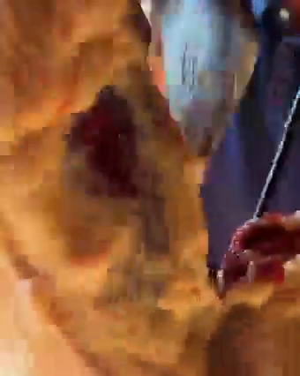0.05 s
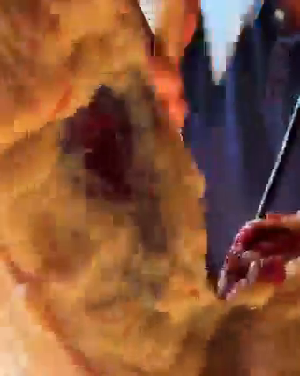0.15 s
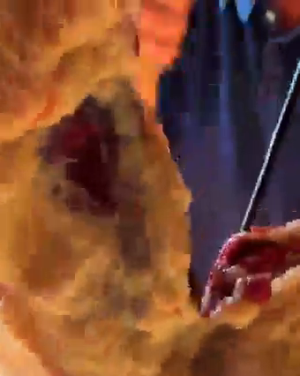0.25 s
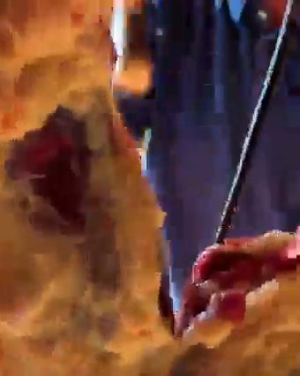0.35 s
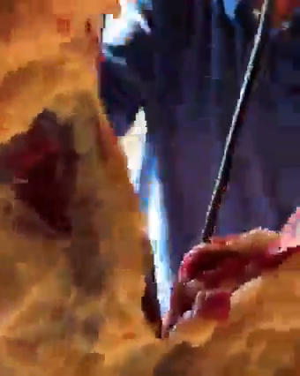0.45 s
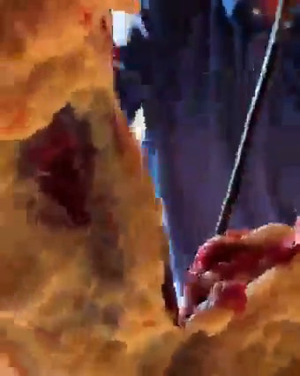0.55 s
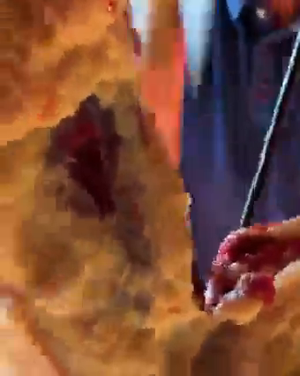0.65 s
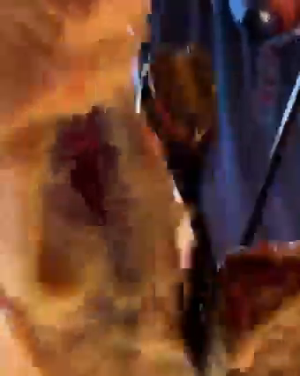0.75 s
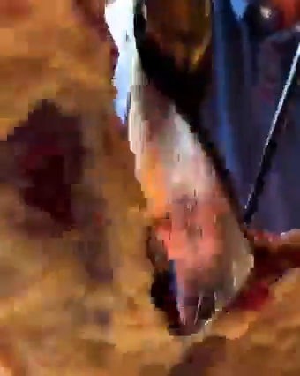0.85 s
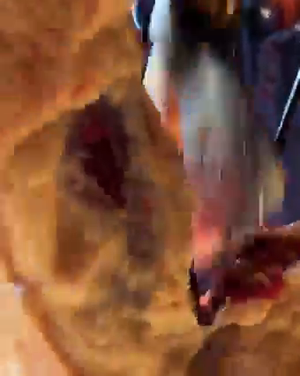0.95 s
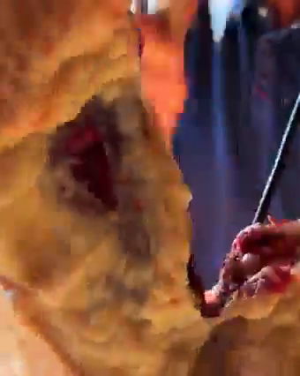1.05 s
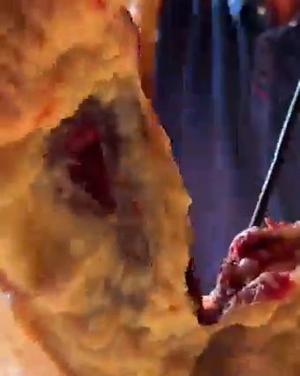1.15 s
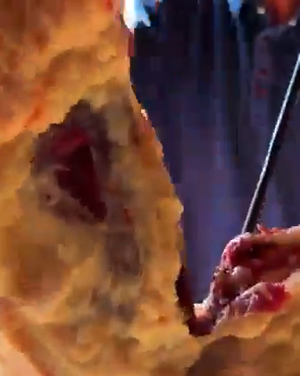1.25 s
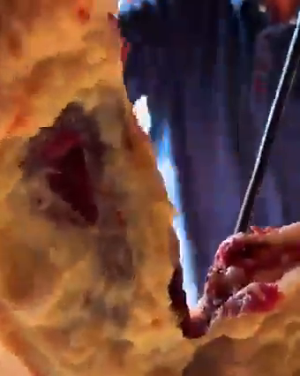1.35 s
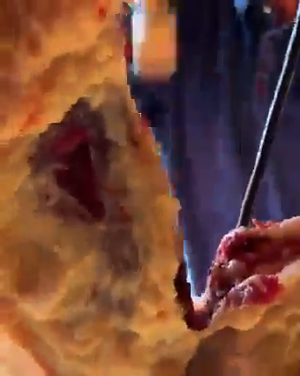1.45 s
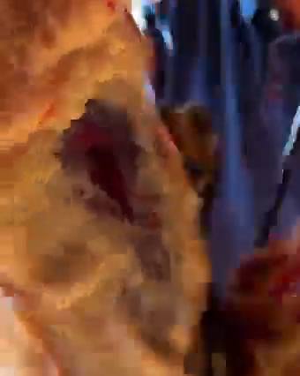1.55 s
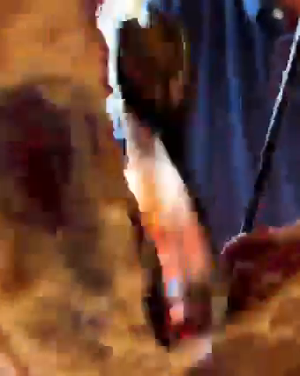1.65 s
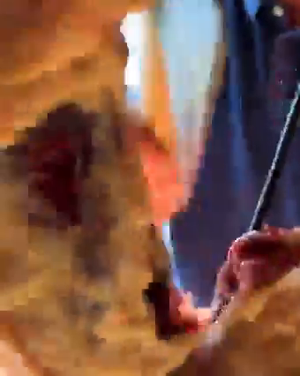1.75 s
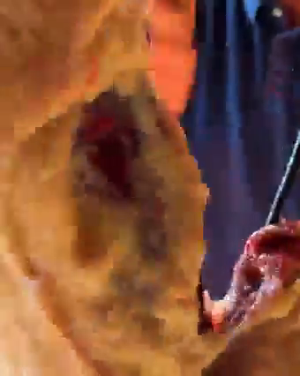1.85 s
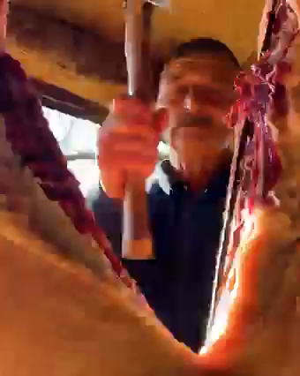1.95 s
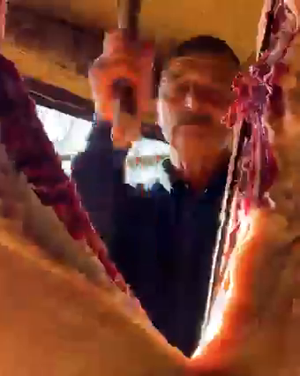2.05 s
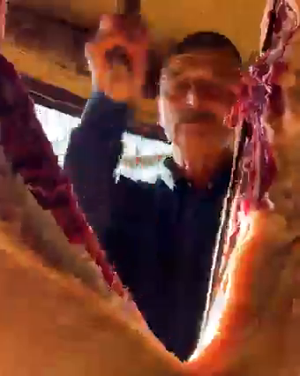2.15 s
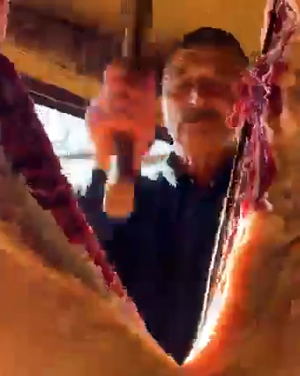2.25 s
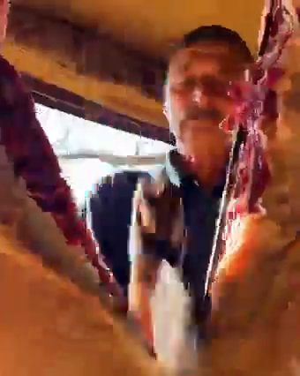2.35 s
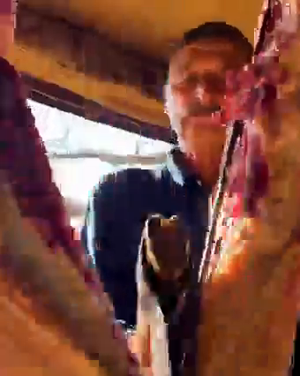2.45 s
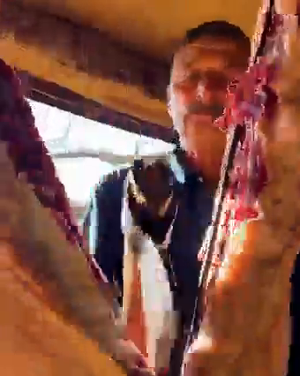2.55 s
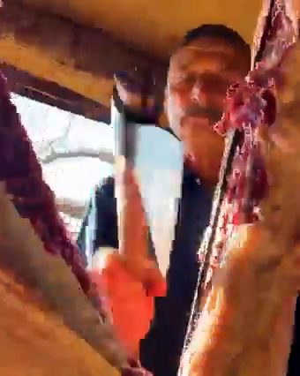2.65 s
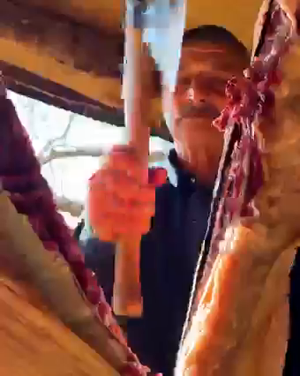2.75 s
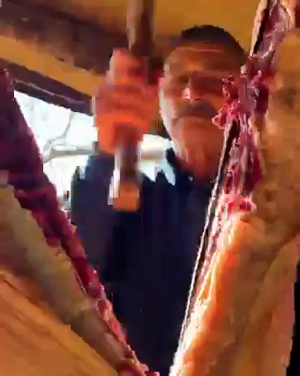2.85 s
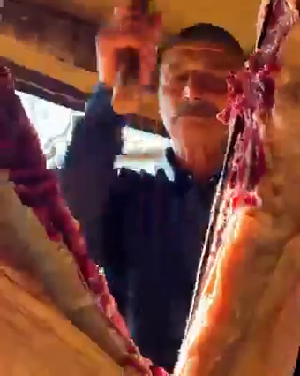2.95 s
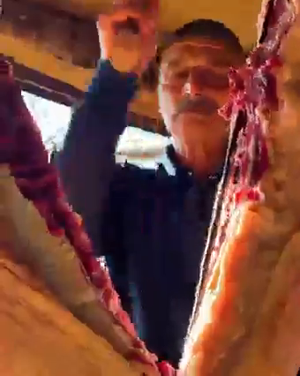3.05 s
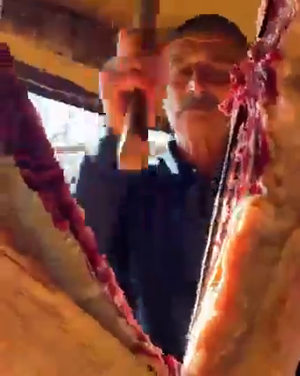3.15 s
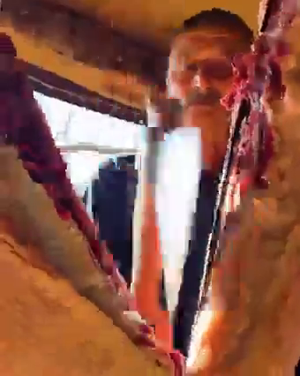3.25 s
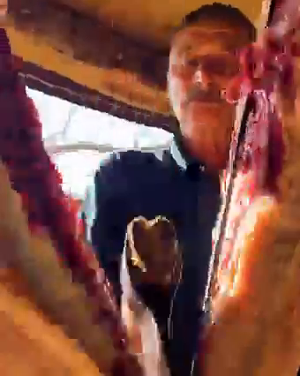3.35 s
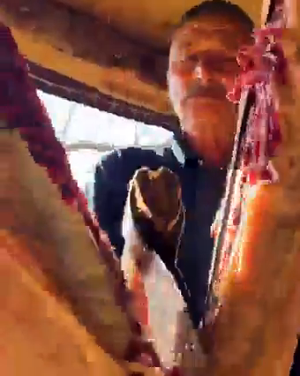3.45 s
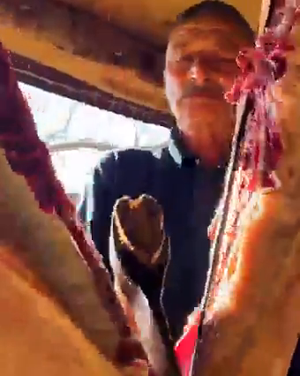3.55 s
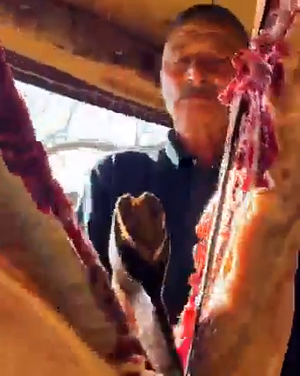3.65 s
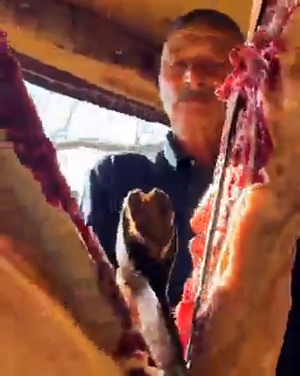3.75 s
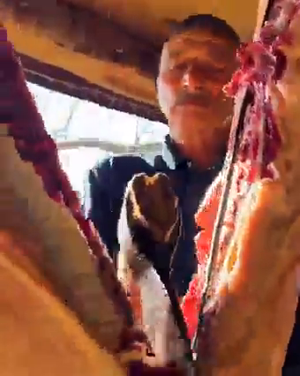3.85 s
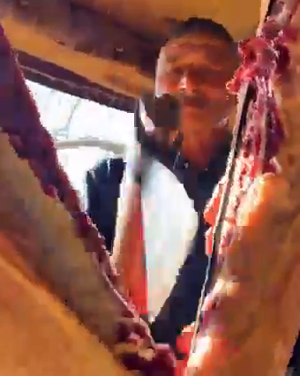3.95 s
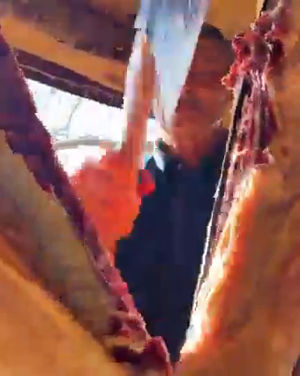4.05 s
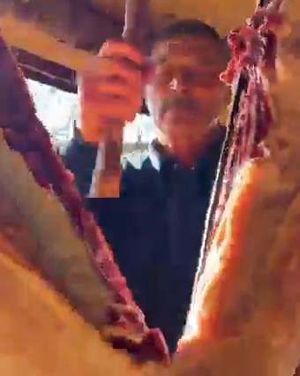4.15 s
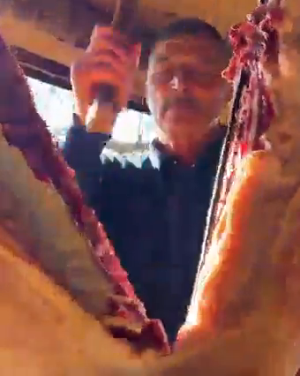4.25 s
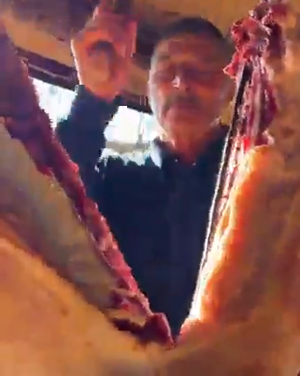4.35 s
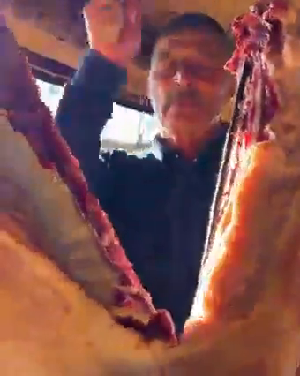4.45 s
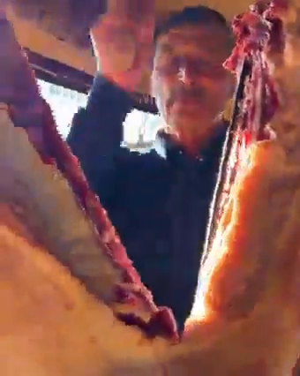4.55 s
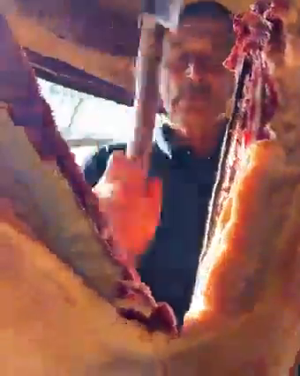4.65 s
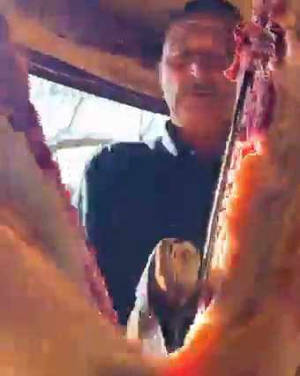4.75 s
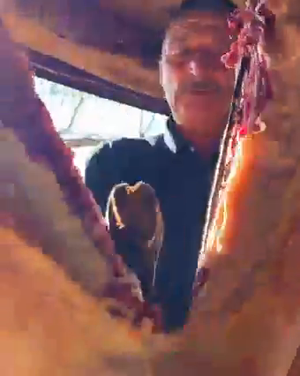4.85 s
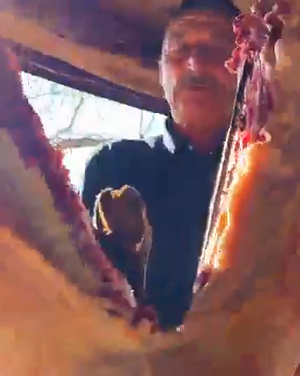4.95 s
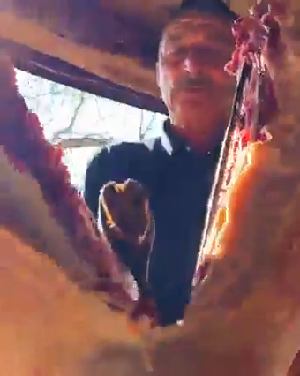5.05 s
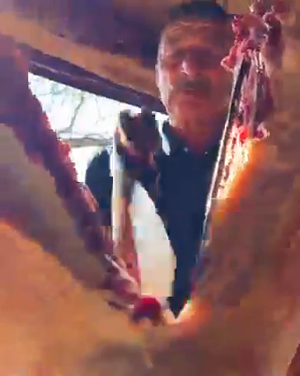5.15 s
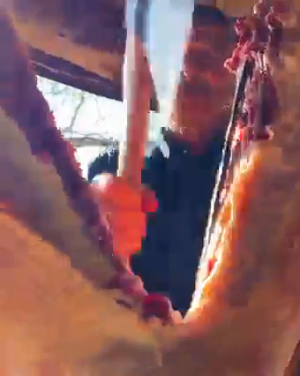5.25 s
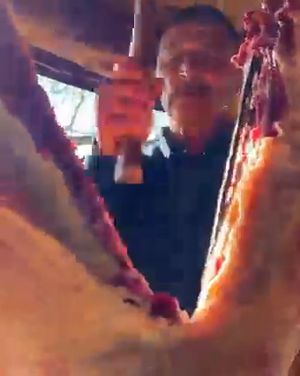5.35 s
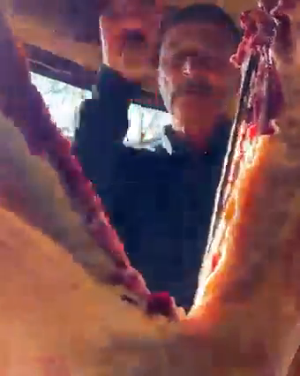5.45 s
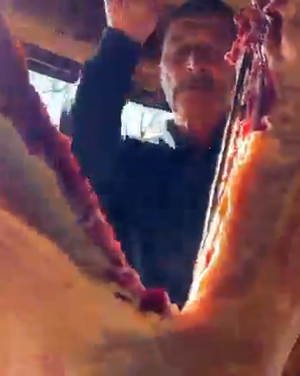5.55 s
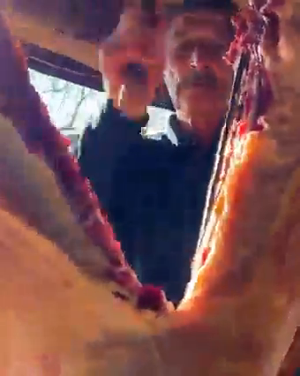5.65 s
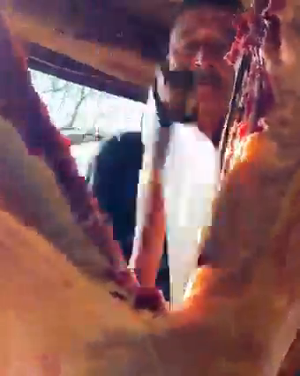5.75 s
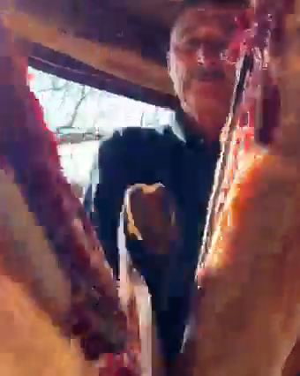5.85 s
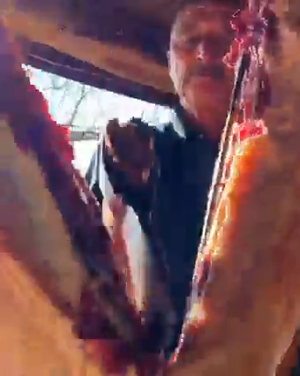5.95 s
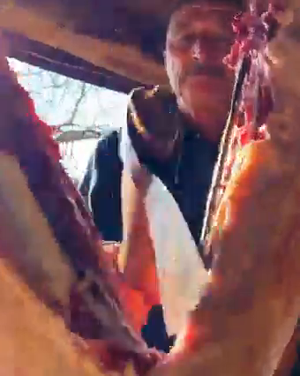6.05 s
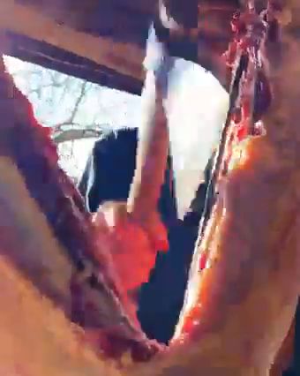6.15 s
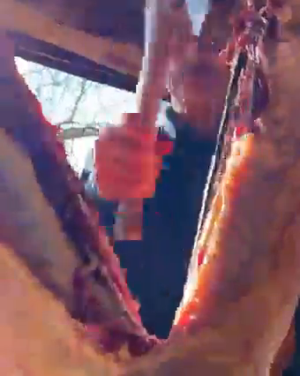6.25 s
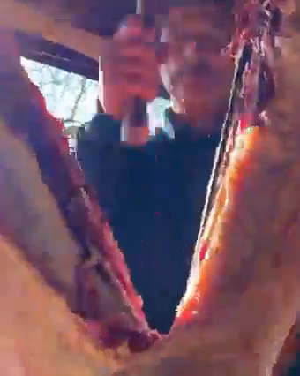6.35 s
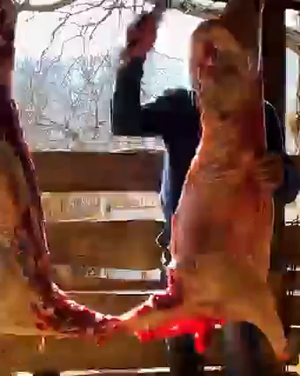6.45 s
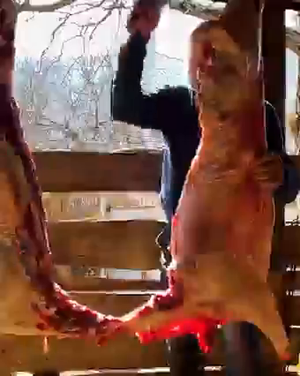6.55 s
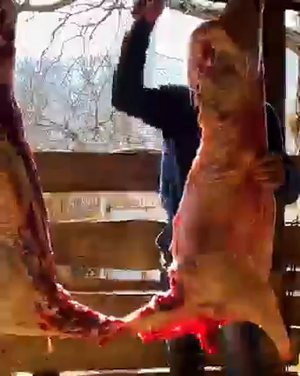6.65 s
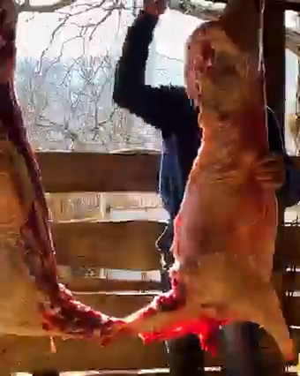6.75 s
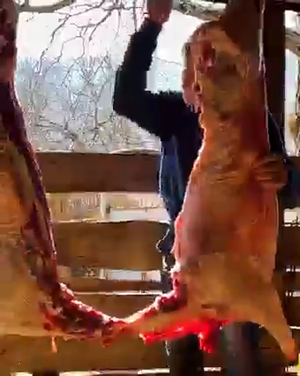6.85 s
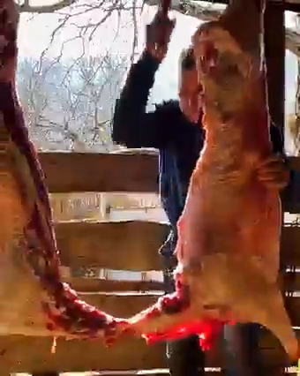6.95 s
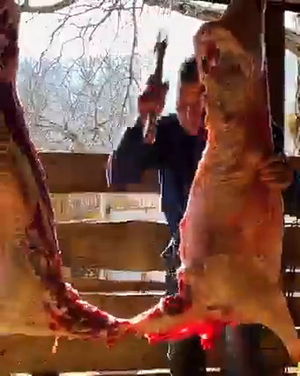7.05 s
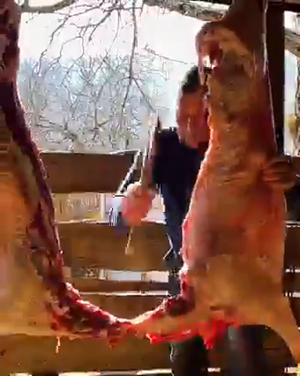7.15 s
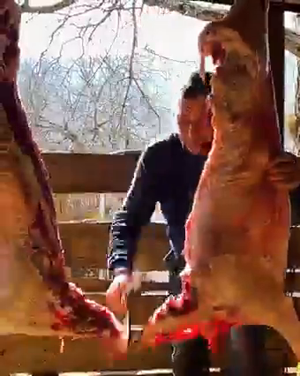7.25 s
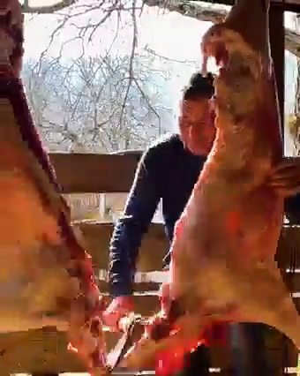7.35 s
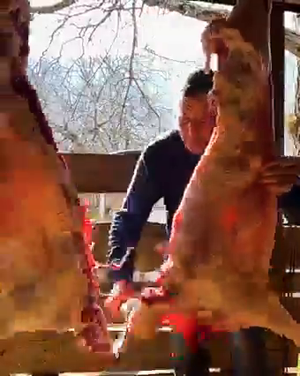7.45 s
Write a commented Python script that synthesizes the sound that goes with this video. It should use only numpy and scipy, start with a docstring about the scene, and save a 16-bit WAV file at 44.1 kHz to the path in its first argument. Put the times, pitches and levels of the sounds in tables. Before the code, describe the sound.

Small birds twitter lively outside an open wooden shed for the first second and a half, over low outdoor rumble and faint hiss. A soft bump comes at 0.3 s. A cleaver hits a hanging carcass at 0.7 s: a sharp crack of bone, dull fleshy thud, short steel ring and tight echo from boards and roof. The next blow at 1.55 s is harder and knockier, with a rough squeak. The air drops quieter near 2 s. Blows at 2.4 and 3.3 s sound more hollow and drumlike; after a gap, longer splintering crunches come at 4.7 and 5.8 s. Faint wet clicks and bumps fill the gaps, with occasional hoarse falling bird calls. At 7.25 to 7.3 s the last chop goes through with snapping bone and ripping sinew, then rustling and dull bumps as the halves part by 7.5 s. Close microphone, little reverberation.

```python
"""Small birds twitter outside an open wooden shed, over low rumble and far hiss of the open country.
Inside, a butcher splits a hanging carcass: each cleaver blow slices fat, bites and crunches through bone.
Shaped noise drives filters and damped modes for backbone, ribs, flesh and steel; wet clicks fill the gaps.
The last blow goes right through: the halves tear in jerks of grainy noise and rustle apart."""
import sys
import numpy as np
from scipy import signal
from scipy.fft import rfft, irfft, next_fast_len
from scipy.io import wavfile

SR = 44100
rng = np.random.default_rng(int(sys.argv[2]) if len(sys.argv) > 2 else 0)


def int16_out(signal):
    """Quantize to a 16-bit WAV file."""
    q = np.round(np.clip(np.atleast_2d(signal).T, -1, 1) * 32767)
    wavfile.write(sys.argv[1], SR, q.astype(np.int16))


N = 331163
SPAN = 22050  # samples given to one event
AGE = np.arange(SPAN) / SR
TIME = np.arange(N) / SR


def from_db(db):
    """Decibels to gain."""
    return 10 ** (np.asarray(db) / 20)


def rms_one(x):
    """Scale to rms 1."""
    return x / np.sqrt(np.mean(x ** 2) + 1e-20)


def burst_one(x):
    """Scale a burst to the energy of a tenth of a second at rms 1."""
    return rms_one(x) * np.sqrt(SR / 10 / x.shape[-1])


def at_hz(points, hz):
    """Read a table on a log-frequency axis."""
    f, value = np.transpose(points)
    return np.interp(np.log(np.maximum(hz, 1)), np.log(f), value)


def gains_in_time(rows):
    """Each dB column of a curve as a gain per sample."""
    s, *columns = np.transpose(rows)
    return [from_db(np.interp(TIME, s, c)) for c in columns]


def pan(db):
    """Left and right gains for a level difference, left over right."""
    return rms_one(from_db(np.array([[db], [-db]]) / 2))


def add(out, s, x):
    """Mix x in at time s."""
    i = int(round(s * SR))
    out[:, i:i + x.shape[-1]] += x[..., :N - i]


def drift(rate, size):
    """Random wander: straight lines between normally distributed knots, rate of them per second."""
    knots = np.arange(size) * rate / SR
    return np.interp(knots, np.arange(4096), rng.standard_normal(4096))


def colour(x, spectrum):
    """Causal (minimum-phase) filter with the given spectrum; it falls off further beyond both ends."""
    size = next_fast_len(x.shape[-1] // 2 + SPAN // 2) * 2
    hz = np.maximum(np.fft.rfftfreq(size, 1 / SR), 1)
    octaves_out = np.abs(np.log2(hz / np.clip(hz, spectrum[0][0], spectrum[-1][0])))
    db = np.maximum(at_hz(spectrum, hz) - 15 * octaves_out, -90)
    # folding the cepstrum onto positive time gives the minimum phase
    cepstrum = irfft(np.log(from_db(db)))
    response = np.exp(rfft(2 * cepstrum[:size // 2], size) - cepstrum[0])
    return irfft(rfft(x, size) * response)[..., :x.shape[-1]]


def ring(x, hz, t60):
    """One damped mode, a two-pole resonator that loses 60 dB in t60 seconds."""
    r, w = from_db(-60 / (t60 * SR)), 2 * np.pi * hz / SR
    return signal.lfilter([np.sin(w), 0, -np.sin(w)], [1, -2 * r * np.cos(w), r * r], x + 1e-18)


# likeness of left and right at the microphone: (frequency [Hz], correlation [-1 to 1])
LIKENESS = [(150, .96), (350, .9), (520, .65), (700, .05), (1600, .35), (3200, -.25), (5500, .2),
            (12000, 0)]


def stereo_noise(size, grain_db=0):
    """Noise most alike on both sides in the bass; grain_db roughens it into separate clicks."""
    grains = from_db(grain_db * np.minimum(rng.exponential(1, size), 5))
    mid, side = rfft(rng.standard_normal((2, size)) * grains)
    alike = np.clip(at_hz(LIKENESS, np.fft.rfftfreq(size, 1 / SR)), -.98, .98)
    both = np.sqrt(1 + alike) * mid + np.sqrt(1 - alike) * side * [[1], [-1]]
    return rms_one(irfft(both, size))


# decay under the shed roof: (frequency [Hz], time to fall 60 dB [s])
SHED_T60 = [(60, 1), (150, 0.025), (350, 0.14), (900, .145), (2500, 0.14), (6000, 0.21), (12000, 0.3)]


def in_shed(force, hz, wet_db, grain_db):
    """Noise crackles with the force; dense reflections off boards and roof die away after it."""
    energy = force ** 2
    keep = from_db(-120 / (at_hz(SHED_T60, hz) * SR))  # energy kept per sample
    lingering = signal.lfilter([1 - keep], [1, -keep], energy)
    far = np.cumsum(energy) / SR * from_db(-26.0 - 64 * AGE)  # faint, longer answer of the yard
    direct = force * stereo_noise(SPAN, grain_db)
    return direct + from_db(wet_db) * np.sqrt(lingering + far) * stereo_noise(SPAN)


FIRST_ECHOES_S = .012  # near boards and posts give back the first echoes within this time


def first_echoes(x, echo_db, count=8):
    """A few distinct reflections, other ones for each side, comb the sound."""
    echoes = np.zeros_like(x)
    for side, lags in enumerate(rng.uniform(.001, FIRST_ECHOES_S, (2, count))):
        for lag, sign in zip(lags, rng.choice([-1, 1], count)):
            echoes[side] += sign * np.pad(x[side], (int(lag * SR), 0))[:SPAN]
    return x + from_db(echo_db) * echoes


ROOF_ECHO_S, ROOF_DB = .021, -13.5


def under_roof(x):
    """The roof throws back one clear echo, with left and right swapped."""
    delayed = np.pad(x[::-1], ((0, 0), (int(ROOF_ECHO_S * SR), 0)))[:, :SPAN]
    return x + from_db(ROOF_DB) * delayed


# outdoor air around the shed: (time [s], rumble level [dB], far hiss level [dB])
AIR = [(0.0, -52, -61.5), (1.86, -52.5, -66.5), (2.05, -61.5, -69), (6.17, -60, -67.5), (7.2, -72.5, -69)]
# colours of the low rumble and the far hiss: (frequency [Hz], gain [dB])
RUMBLE = [(15, -12.5), (55, 4.5), (90, 1.5), (145, -10), (220, -8), (400, -12), (480, -22), (800, -51.5)]
HISS = [(350, -16), (550, 0.5), (850, -0.5), (1500, 4), (3200, -1.5), (4500, -9), (6200, -16.5), (7200, -8),
        (8200, -18.5), (11000, -21), (16000, -23)]


def air():
    """Low rumble and far hiss of the open country: filtered noise whose levels waver."""
    rumble, hiss = gains_in_time(AIR)
    white = stereo_noise(next_fast_len(N))[:, :N]
    low = rumble * from_db(0.6 * drift(14.0, N)) * rms_one(colour(white, RUMBLE))
    high = hiss * from_db(0.2 * drift(40, N)) * rms_one(colour(white, HISS))
    return low + high


def chirp(length_s, pitches_hz, hoarse, db):
    """A whistle that arches through three pitches and rasps, smeared by the trees it comes through."""
    along = np.minimum(AGE / length_s, 1)
    arch_hz = np.polyval(np.polyfit([0, .5, 1], pitches_hz, 2), along)
    hz = arch_hz * (1 + hoarse * drift(1100, SPAN))
    note = np.sqrt(along) * (1 - along) * np.sin(2 * np.pi * np.cumsum(hz) / SR)
    trees = rng.standard_normal((2, SPAN)) * from_db(-260 * AGE)
    smeared = signal.fftconvolve(note[None], trees, axes=1)[:, :SPAN]
    heard = burst_one(note) + from_db(-2.5) * burst_one(smeared)
    return from_db(db) * burst_one(heard) * np.sqrt(length_s * 10)  # longer notes carry more energy


# short arcs of twitter:
# (time [s], start pitch [Hz], middle pitch [Hz], end pitch [Hz], level [dB])
TWITTERS = [(0.036, 4530, 5020, 4850, -63), (.085, 4100, 3560, 3600, -64.5), (.209, 3670, 4100, 3680, -61),
            (.484, 5200, 3920, 4670, -58.5), (.56, 4100, 3923, 3540, -64.5),
            (0.968, 4780, 4520, 3900, -61.5), (1.047, 3720, 4300, 4600, -61),
            (1.132, 4800, 4730, 4660, -62.5), (1.322, 5100, 3950, 4460, -59.5),
            (1.372, 3980, 4430, 3930, -61)]
# clear notes of another bird: (time [s], length [s], pitch [Hz], level [dB])
WHISTLES = [(.826, .14, 3040, -58), (1.908, .04, 3940, -50), (2.043, .035, 3900, -57)]
# one bird's hoarse falling call: (time [s], length [s], level [dB])
CALLS_OF_BIRD = [(2.209, 0.13, -66.5), (3.082, 0.16, -65.5), (3.886, 0.12, -65), (5.645, 0.15, -65.5),
                 (6.089, 0.12, -63.5), (6.754, 0.22, -70.5)]
# hoarseness and sag are shares of the pitch
TWITTER_NOTE_S, TWITTER_HOARSE = .04, .055
WHISTLE_SAG, WHISTLE_HOARSE = 0.011, 0.018
CALL_HZ, CALL_HOARSE = (4500, 3400, 2850), .145
# more birds far off: end [s], number of notes, pitch range [Hz], level [dB]
CHORUS_END_S, CHORUS_COUNT, CHORUS_HZ, CHORUS_DB = 1.42, 30, (3300, 5500), -72.5


def birds():
    """Runs of twitter, clear whistles and falling calls from the trees, each note a gliding sine."""
    out = np.zeros((2, N))
    for when, first, last in rng.random((CHORUS_COUNT, 3)):
        pitches_hz = np.interp([first, (first + last) / 2, last], [0, 1], CHORUS_HZ)
        note = chirp(TWITTER_NOTE_S, pitches_hz, TWITTER_HOARSE, CHORUS_DB)
        add(out, when * CHORUS_END_S, note)
    for s, *pitches_hz, db in TWITTERS:
        add(out, s, chirp(TWITTER_NOTE_S, pitches_hz, TWITTER_HOARSE, db))
    for s, length_s, hz, db in WHISTLES:
        add(out, s, chirp(length_s, [hz, hz, hz * (1 - WHISTLE_SAG)], WHISTLE_HOARSE, db))
    for s, length_s, db in CALLS_OF_BIRD:
        add(out, s, chirp(length_s, CALL_HZ, CALL_HOARSE, db))
    return out


# dull bumps as the carcass shifts and the blade comes free:
# (time [s], length [s], low level [dB], knock level [dB])
BUMPS = [(0.275, 0.069, -47.5, -62), (3.5, 0.0081, -45.5, -54.5), (5.054, 0.051, -49.5, -46),
         (6.122, 0.038, -51, -45.5), (6.39, 0.0094, -65, -69.5), (7.326, 0.021, -36.5, -35),
         (7.412, 0.051, -36.5, -50), (7.471, 0.036, -34, -34)]
# colours of flesh, rib cage and a soft shove against the carcass: (frequency [Hz], gain [dB])
THUD = [(20, -16), (40, 1.5), (62, 0), (110, -3), (160, -6), (260, -21)]
RIBS = [(110, -14.5), (160, -5), (205, 4.5), (420, 7), (490, -3), (600, -4), (700, -0.5), (850, -42)]
SHOVE = [(200, -18), (420, 11.5), (560, 1.5), (1000, -6.5), (1900, -16.5), (5000, -52)]


def bump(length_s, low_db, knock_db):
    """A soft shove, slow to rise, sounds mostly in the low resonances."""
    force = np.exp(-(AGE / length_s) ** 2) * (1 - np.exp(-AGE / (0.19 * length_s)))
    shove = in_shed(force, 270, wet_db=-1.5, grain_db=2.5)
    low = colour(shove, RIBS) + from_db(4.0) * colour(shove, THUD)
    low = from_db(low_db) * burst_one(low) * pan(db=-3.5)
    return low + from_db(knock_db) * burst_one(colour(shove, SHOVE))


# wet smacks of meat and fat:
# (time [s], length [s], level [dB], lower clicks against the brightest [dB])
SMACKS = [(0.279, 0.06, -68.5, 9), (0.873, 0.0073, -55, 5.5), (1.718, 0.0056, -60.5, -3),
          (3.444, 0.011, -59.5, 8), (3.861, 0.093, -68, 5), (4.197, 0.067, -65.5, 3),
          (5.927, 0.022, -59.5, 7.5)]
# colours of bright spray, steel edge in bone, and crack: (frequency [Hz], gain [dB])
SPRAY = [(5000, -18.5), (6800, -3), (7500, -6.5), (8400, 1), (13000, -3), (15600, -5), (17000, -17)]
EDGE = [(3600, -13.5), (4400, -1.5), (5100, 2), (5450, -5.5), (5900, -1), (6700, -13), (8000, -28)]
CRACK = [(1600, -34), (2020, -5), (2520, -6), (2800, -2), (3100, -0.5), (3400, -5), (3750, -5), (4200, -13),
         (5200, -31)]


def smack(length_s, db, lower_db):
    """Sticky tissue parts in tiny bright clicks."""
    sticking = from_db(4 * drift(22, SPAN))
    swell = (1 - np.exp(-3 * AGE / length_s)) * np.exp(-(AGE / length_s) ** 2)
    clicks = in_shed(sticking * swell, 16000, wet_db=-8.0, grain_db=4.5)
    lower = colour(clicks, EDGE) + colour(clicks, CRACK)
    return from_db(db) * burst_one(colour(clicks, SPRAY) + from_db(lower_db) * lower)


# the steel blade, damped by the meat: (mode frequency [Hz], level [dB])
BLADE = [(2260, -9), (2655, -2), (2930, 0), (3130, -1), (3400, -5.5), (4500, -4), (5000, -1.5), (5650, 0),
         (6130, -5), (8050, -5), (10300, -6), (13200, -3)]
BLADE_T60 = .18  # s, decay of the lowest mode; higher ones die sooner
GRIP_DETUNE, GRIP_DB = .012, 2.5  # scatter of the modes from blow to blow: pitch share, level


def blade_ring(fracture):
    """The bone grips the steel differently at every blow, which shifts each mode and its strength."""
    out = 0
    for (hz, db), (shift, swing) in zip(BLADE, rng.standard_normal((len(BLADE), 2))):
        t60 = BLADE_T60 * np.sqrt(BLADE[0][0] / hz)
        mode = burst_one(ring(fracture, hz * (1 + GRIP_DETUNE * shift), t60))
        out = out + from_db(db + GRIP_DB * swing) * mode
    return burst_one(out)


# colour of the knock: (frequency [Hz], gain [dB])
KNOCK = [(450, -22), (600, -4), (850, -5), (1120, 1.5), (1420, -4.5), (1680, -1.5), (1900, -4.5),
         (2300, -31)]
# level, share of the hardness that it follows, decay, pitch ratio of a second mode
SPINE_DB, SPINE_FOLLOWS, SPINE_T60_S, SPINE_PAIR = -8, 1, 0.18, .91


def backbone_knock(crunch, fracture, knock_hz, hard_db):
    """The backbone rattles and rings in two modes, which stand out more after a hard blow."""
    rattle = first_echoes(in_shed(crunch, 1200, wet_db=-4.5, grain_db=-0.5), echo_db=-13)
    modes_hz = (knock_hz, knock_hz * SPINE_PAIR)
    tone = sum(burst_one(ring(fracture, hz, SPINE_T60_S)) for hz in modes_hz)
    tone = from_db(SPINE_DB + SPINE_FOLLOWS * hard_db) * burst_one(tone)
    return burst_one(burst_one(colour(rattle, KNOCK)) + tone)


RIBS_T60_S = .19
# hum: level against the rattle, share by which the pitch sags, time of the sag
RIB_TONE_DB, RIBS_SAG, RIBS_SAG_S = -4, 0.093, 0.04
# one solid, damped thump of the chest: level against the rattle, pitch, decay
THUMP_DB, THUMP_HZ, THUMP_T60_S = -10.5, 277, 0.014


def rib_tone(age, hz, swell_s):
    """The rib cage swells while the blade pushes, then hums on and sags in pitch as it slackens."""
    pitch = hz * (1 - RIBS_SAG * (1 - np.exp(-age / RIBS_SAG_S))) * (age > 0)
    swell = (1 - np.exp(-age / swell_s)) * from_db(-60 * age / RIBS_T60_S)
    return swell * np.sin(2 * np.pi * np.cumsum(pitch) / SR)


def rib_cage(age, crunch, ribs_hz, crunch_s):
    """The rib cage rings like a damp drum: rattle, sagging hum and a chest thump."""
    push = np.exp(-age / 0.00087) - np.exp(-age / 0.00039)
    rattle = burst_one(colour(in_shed(crunch, 520, wet_db=1.0, grain_db=3.0), RIBS))
    hum = from_db(RIB_TONE_DB) * burst_one(rib_tone(age, ribs_hz, crunch_s))
    thump = from_db(THUMP_DB) * burst_one(ring(push, THUMP_HZ, THUMP_T60_S))
    return burst_one(rattle + hum + thump)


def flesh_thud(age):
    """The heavy flesh swings up slowly and wobbles on as low noise."""
    force = np.exp(-(age / 0.011) ** 2) * (1 - np.exp(-age / 0.0017))
    return burst_one(colour(in_shed(force, 120, wet_db=6.0, grain_db=4.0), THUD))


# cleaver blows: (time the edge meets bone [s], crunch length [s], strength [dB],
# hardness: more bone and less ribs [dB], flesh thud level [dB], ribs pitch [Hz], knock pitch [Hz],
# crack pitch [Hz], crack against strength [dB], edge against strength [dB],
# crack left over right [dB], slicing of the fat against the crunch [dB])
CHOPS = [(0.7106, 0.0046, -25.5, 6.5, -28.5, 310, 1251, 3270, 1, -2.5, -3.5, -10),
         (1.564, 0.0073, -26, 11, -36.5, 312.4, 1119, 3094, 1.5, 3, -2, -4.5),
         (2.3838, 0.017, -27.5, -1.5, -37, 377.5, 1067, 2960, 2.5, -1, 4.5, -19),
         (3.301, 0.011, -24, 0.5, -33.5, 387, 696, 2985, -2, -2, 4, -17.5),
         (4.7312, 0.039, -25, 1, -33, 411.7, 1073, 3430, -1, -1, 2.5, -20),
         (5.7921, 0.036, -26.5, -0.5, -29.5, 427, 1116, 2845, 1, -1.5, 0.5, -19),
         (7.2902, 0.04, -28.5, 5, -45.5, 410, 1132, 3210, 6, 1, -2, -17)]
# the edge spends FAT_S in the fat before it meets bone, pressing ever harder
FAT_S, SLICE_GROWTH_S = .016, 0.004
# parts of a blow against its strength, share of the hardness that goes into the knock
RIBS_DB, KNOCK_DB, BLADE_DB, SPRAY_DB = 0.5, -4.5, -9, -4
KNOCK_FOLLOWS = 0.43
# a longer crunch splinters more: treble gained per doubling of its usual length
USUAL_CRUNCH_S, SPLINTER_DB_PER_DOUBLING = 0.032, 1.72
CRACK_RING_DB, CRACK_T60_S = -4, 0.031  # the split bone rings briefly at the crack pitch
JERKS_PER_S, JERK_DB = 220, 3.5  # bone gives way in jerks


def chop(crunch_s, db, hard_db, thud_db, ribs_hz, knock_hz, crack_hz, crack_db, edge_db, pan_db,
         slice_db):
    """The edge slices fat and bites, bone gives way for milliseconds; carcass and blade answer."""
    age = np.maximum(AGE - FAT_S, 0)  # time since the edge met bone
    treble_db = db + SPLINTER_DB_PER_DOUBLING * np.log2(crunch_s / USUAL_CRUNCH_S)

    pressing = np.exp(np.minimum(AGE - FAT_S, 0) / SLICE_GROWTH_S) * (AGE < FAT_S)
    slicing = from_db(slice_db) * pressing
    bite = np.exp(-age / 0.0079) * (1 - np.exp(-age / 0.00027))
    crunch = np.exp(-(age / crunch_s) ** 4) * (1 - np.exp(-age / 0.00031))
    crunch = crunch * from_db(JERK_DB * drift(JERKS_PER_S, SPAN))
    fracture = (bite + crunch) * stereo_noise(SPAN)

    spray_force = from_db(11.5) * (bite + slicing) + crunch
    spray = first_echoes(in_shed(spray_force, 7300, wet_db=-16.0, grain_db=4.5), echo_db=-17.0)
    spray = from_db(treble_db + SPRAY_DB) * burst_one(colour(spray, SPRAY))
    bone = in_shed(slicing + bite + crunch, 4700, wet_db=-12.0, grain_db=5.0)
    bone = first_echoes(bone, echo_db=-13.0)

    blade = from_db(db + BLADE_DB) * blade_ring(fracture)
    crack_ring = from_db(CRACK_RING_DB) * burst_one(ring(fracture, crack_hz, CRACK_T60_S))
    crack = burst_one(burst_one(colour(bone, CRACK)) + crack_ring)
    crack = from_db(db + crack_db) * crack * pan(pan_db - 0.5)
    edge = from_db(treble_db + edge_db) * burst_one(colour(bone, EDGE)) * pan(pan_db / 2 + 6.5)
    knock = backbone_knock(crunch, fracture, knock_hz, hard_db)
    knock = from_db(db + KNOCK_DB + KNOCK_FOLLOWS * hard_db) * knock * pan(db=1.0)
    ribs = rib_cage(age, crunch, ribs_hz, crunch_s)
    ribs = from_db(db + RIBS_DB - hard_db) * ribs * pan(db=-5.0)
    thud = from_db(thud_db) * flesh_thud(age)
    return thud + ribs + under_roof(blade + knock + crack + edge) + spray


# squeaks of the edge along the bone:
# (time [s], length [s], first pitch [Hz], last pitch [Hz], level [dB])
RIPS = [(1.564, 0.014, 2980, 3120, -26), (7.272, 0.02, 2850, 3960, -36.5),
        (7.439, 0.044, 2330, 2366, -48.5)]
RIP_HOARSE = .05  # share of the pitch


def rip(length_s, start_hz, end_hz, db):
    """Steel drags over bone in a rough squeak that swells and rises."""
    along = np.minimum(AGE / length_s, 1)
    hz = (start_hz + (end_hz - start_hz) * along) * (1 + RIP_HOARSE * drift(1500, SPAN))
    squeak = along ** 2 * np.sqrt(1 - along) * np.sin(2 * np.pi * np.cumsum(hz) / SR)
    return from_db(db) * burst_one(first_echoes(np.array([squeak, squeak]), echo_db=-19))


# pull on the last bone and sinew: (time [s], level [dB])
PULL = [(7.241, -37.5), (7.27, -34), (7.287, -27)]
# rows flesh, knock, crack and spray of the tear:
# (level against the pull [dB], swelling time [s], fade after the parting [dB per s])
TEAR_PARTS = [(-4, 0.0056, 58), (-2.5, 0.0021, 63), (4.5, 0.0029, 123), (-6, 0.0019, 141)]
PARTING_S = 7.303  # the moment when the halves part
SNAPS_PER_S, SNAP_DB = 79, -8  # splinters of bone snap one by one: level against the ripping fibres


def tearing():
    """Bone and sinew rip in jerks; after the parting bright cracking dies first and flesh rustles on."""
    out = np.zeros((2, N))
    start = PULL[0][0]
    pull_db = np.interp(start + AGE, *np.transpose(PULL))
    apart_s = np.maximum(start + AGE - PARTING_S, 0)

    fibres = stereo_noise(SPAN, grain_db=4.2) * from_db(3.5 * drift(110, SPAN))
    snap_times = (rng.random(SPAN) < SNAPS_PER_S / SR) + 1e-18
    snaps = signal.lfilter([1], [1, -np.exp(-1 / (0.0012 * SR))], snap_times)
    snaps = from_db(SNAP_DB) * rms_one(snaps * stereo_noise(SPAN))
    rips = first_echoes(fibres + snaps, echo_db=-6.5)

    flesh = burst_one(colour(rips, RIBS)) + from_db(-3.5) * burst_one(colour(rips, THUD))
    flesh = flesh + from_db(4.5) * burst_one(colour(stereo_noise(SPAN), SHOVE))
    bone = burst_one(colour(rips, CRACK) + from_db(-9) * colour(rips, EDGE))
    parts = (flesh, colour(rips, KNOCK), bone, colour(rips, SPRAY))
    for (db, swell_s, fade_db_per_s), part in zip(TEAR_PARTS, parts):
        level = from_db(pull_db + db - fade_db_per_s * apart_s)
        add(out, start, rms_one(part) * (1 - np.exp(-AGE / swell_s)) * level)
    return out


# larger pieces of bone that break in the tear: (time [s], knock level [dB], crack level [dB])
BREAKS = [(7.248, -40.5, -48), (7.273, -38.5, -40), (7.298, -23, -33), (7.318, -44, -37.5),
          (7.375, -52, -44)]


def bone_break(knock_db, crack_db):
    """A piece of bone gives way with a short knock and crack, both from one decaying crackle."""
    crackle = in_shed(np.exp(-AGE / 0.0098), 1500, wet_db=-3, grain_db=3.5)
    knock = from_db(knock_db) * burst_one(colour(crackle, KNOCK))
    return knock + from_db(crack_db) * burst_one(colour(crackle, CRACK) + colour(crackle, EDGE))


# after each blow the wet flesh peels off the blade as it is worked free: delay, length, level
PEEL_DELAY_S, PEEL_S, PEEL_DB = .2, 0.39, -81.5
# the carcass swings back against its rope after each blow: delay, length, levels
SWING_DELAY_S, SWING_S = .137, .02
SWING_LOW_DB, SWING_KNOCK_DB = -56.5, -61.5


def scene():
    """All events over the outdoor air."""
    out = air() + birds() + tearing()
    for s, *row in CHOPS:
        add(out, s - FAT_S, chop(*row))
        add(out, s + SWING_DELAY_S, bump(SWING_S, SWING_LOW_DB, SWING_KNOCK_DB))
        add(out, s + PEEL_DELAY_S, smack(PEEL_S, PEEL_DB, lower_db=3))
    for source, table in ((bump, BUMPS), (smack, SMACKS), (rip, RIPS), (bone_break, BREAKS)):
        for s, *row in table:
            add(out, s, source(*row))
    return out


CUTOFF_HZ = 16800


def record(dry):
    """The microphone has a narrow dip; peaks are rounded and the top is cut."""
    dipped = signal.lfilter(*signal.iirnotch(2010, 8, fs=SR), dry)
    dipped = dipped + from_db(-18.5) * (dry - dipped)  # limits the depth of the dip
    top_cut = signal.cheby2(16, 70, CUTOFF_HZ, fs=SR, output="sos")
    return signal.sosfilt(top_cut, np.tanh(dipped))


dry = scene()
out = record(dry)
int16_out(out)
```